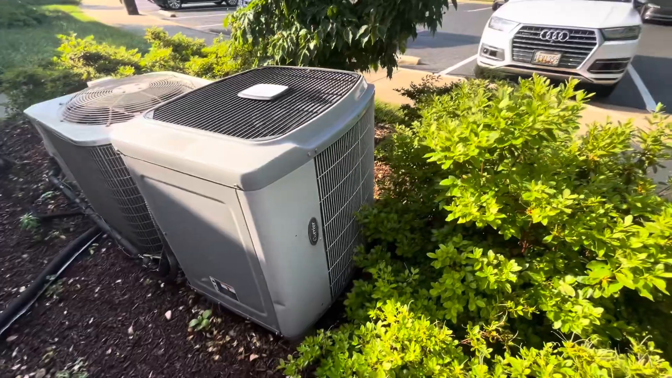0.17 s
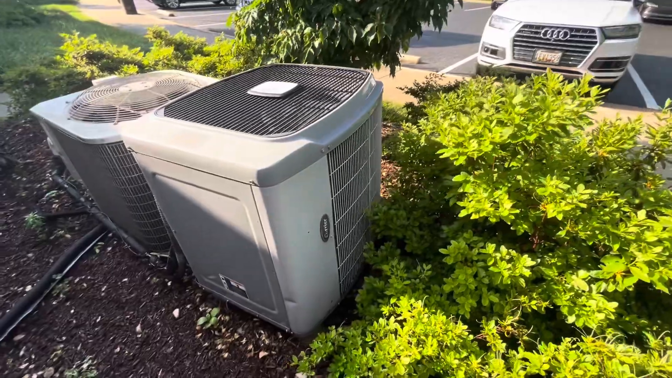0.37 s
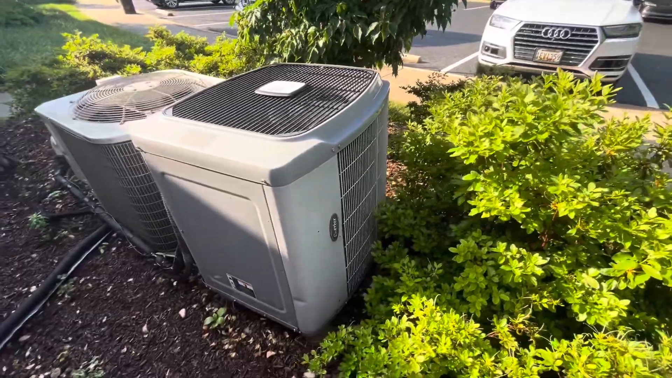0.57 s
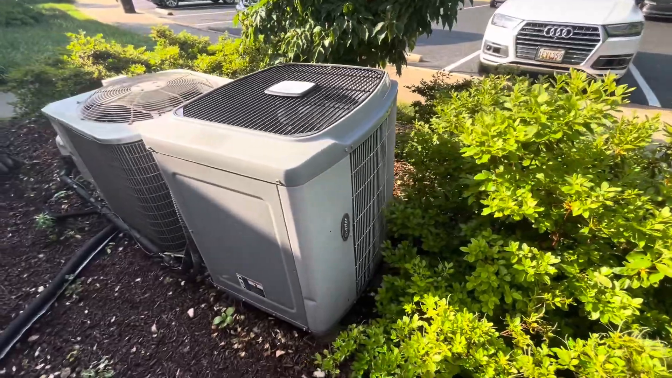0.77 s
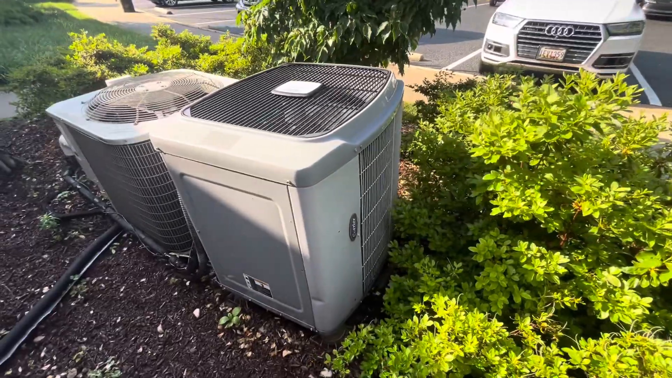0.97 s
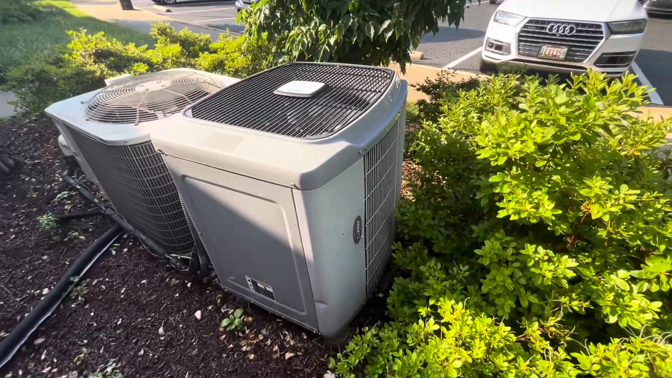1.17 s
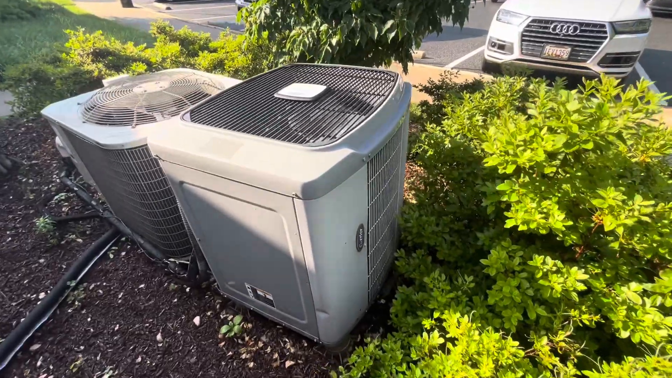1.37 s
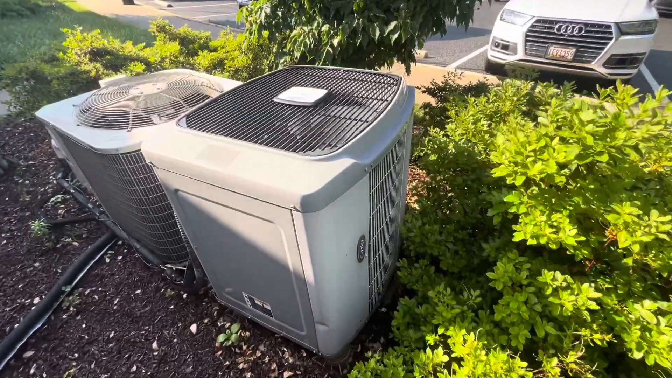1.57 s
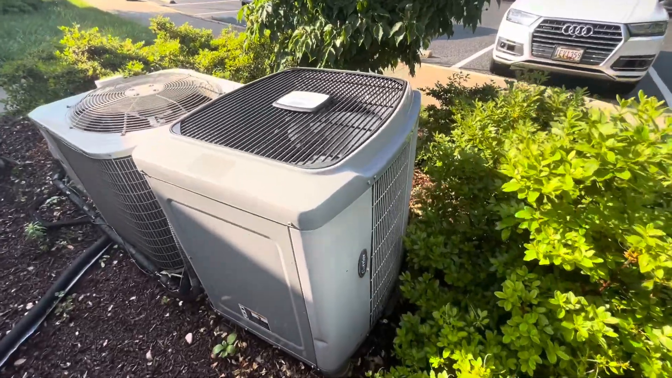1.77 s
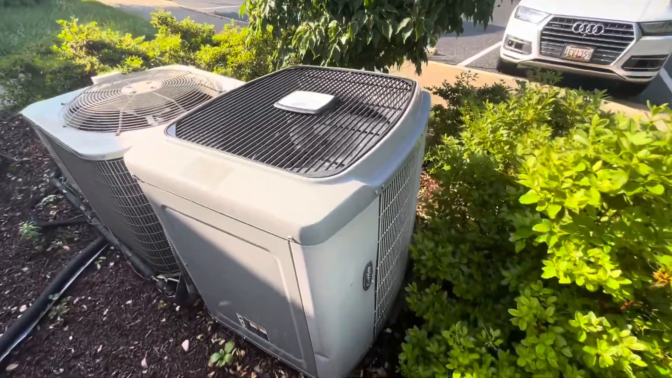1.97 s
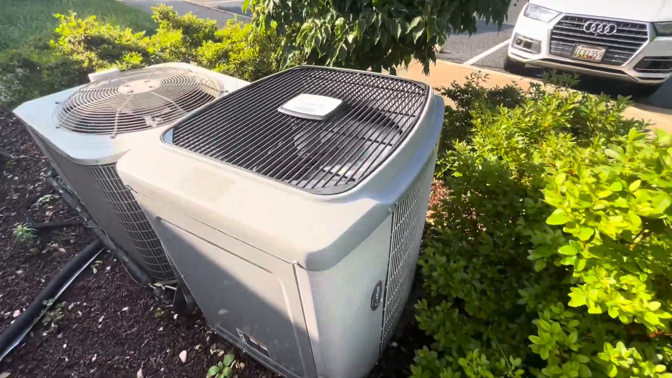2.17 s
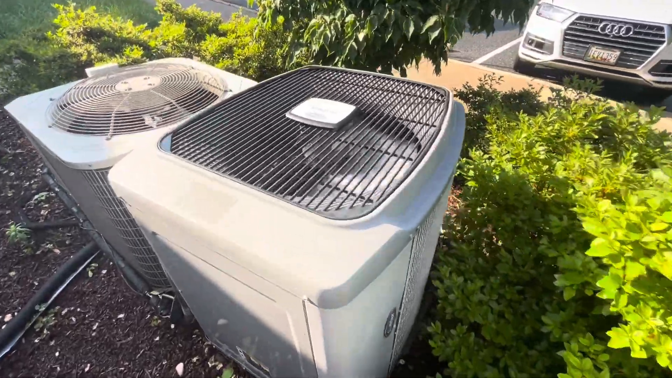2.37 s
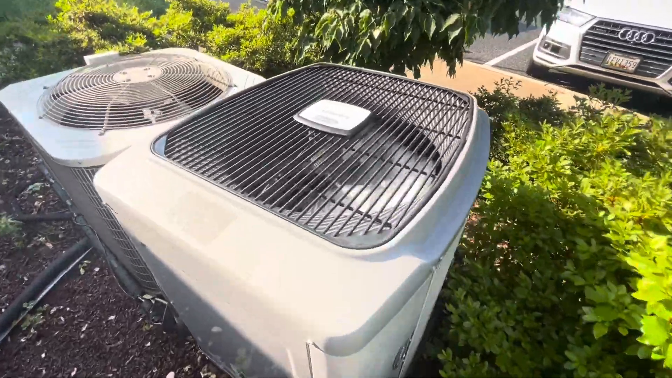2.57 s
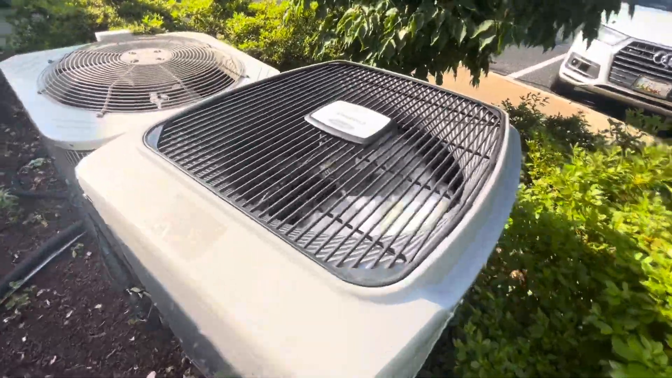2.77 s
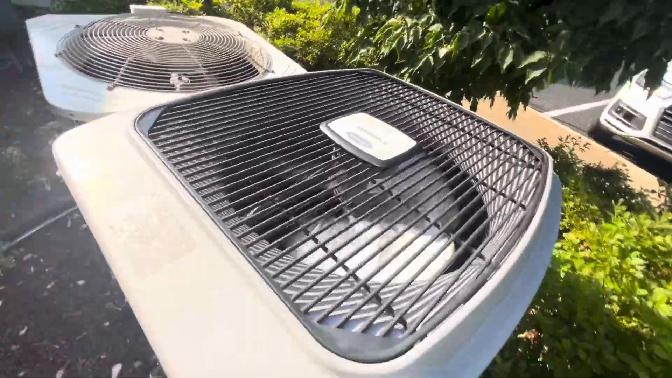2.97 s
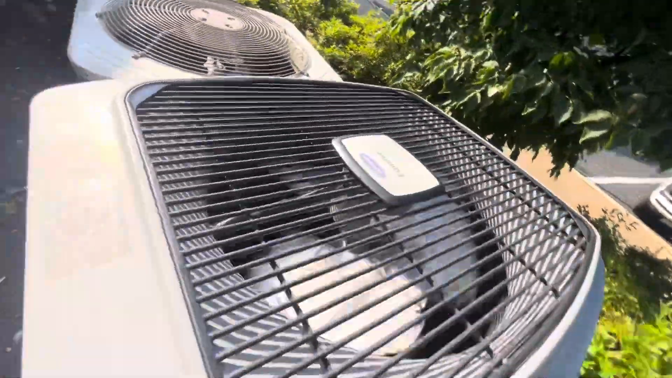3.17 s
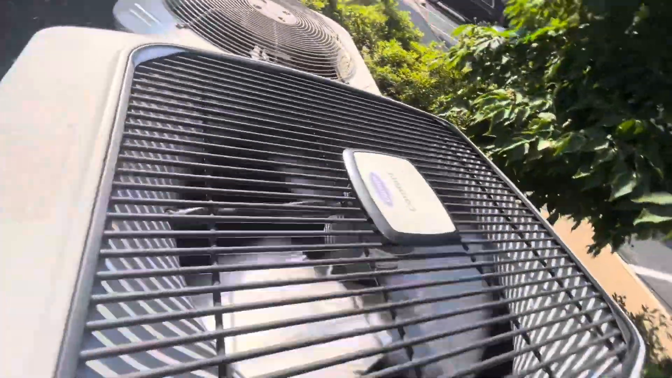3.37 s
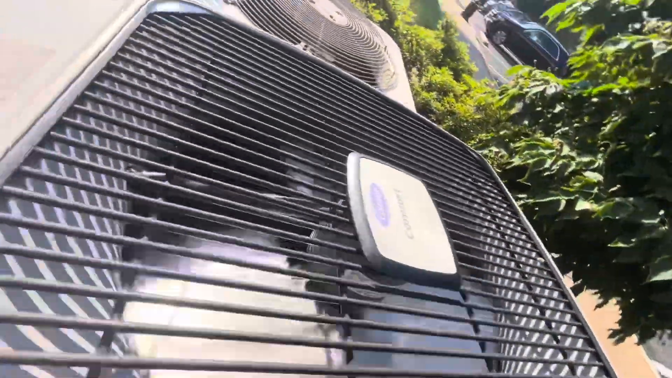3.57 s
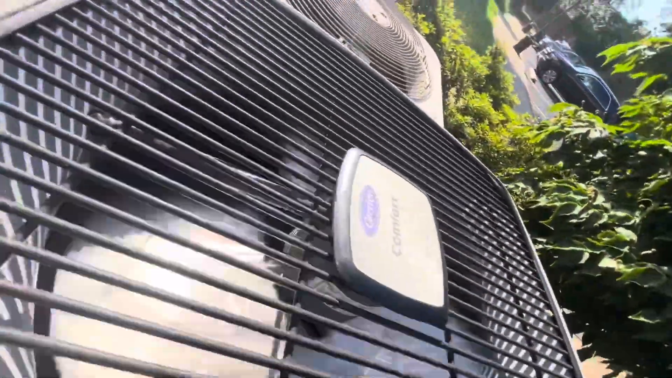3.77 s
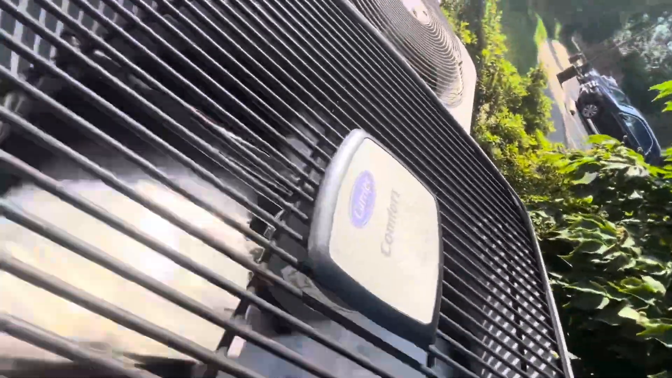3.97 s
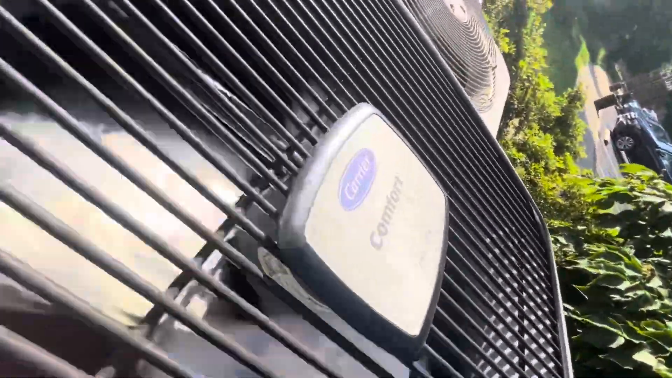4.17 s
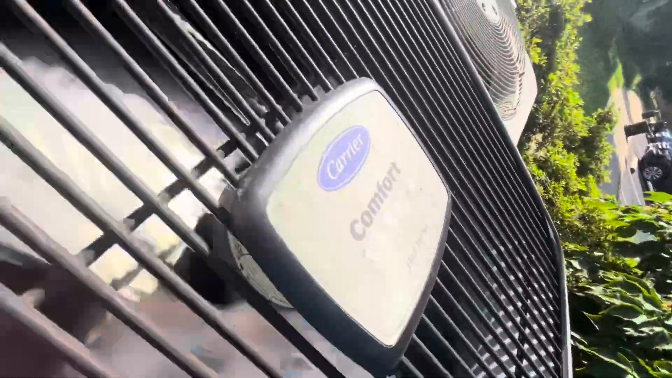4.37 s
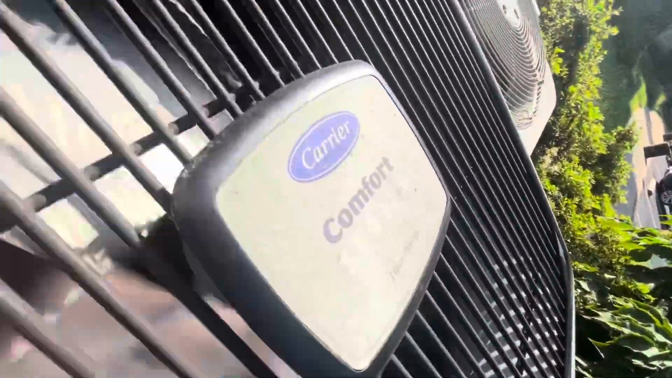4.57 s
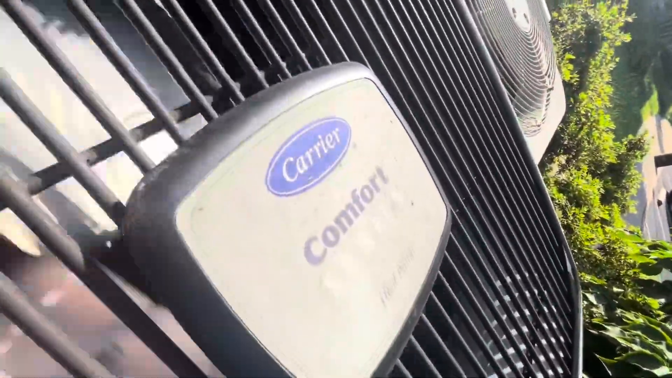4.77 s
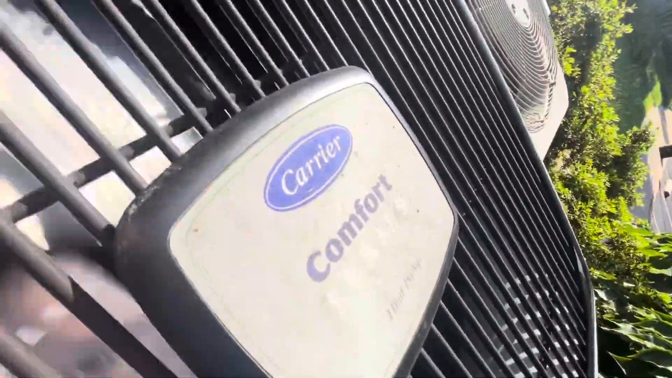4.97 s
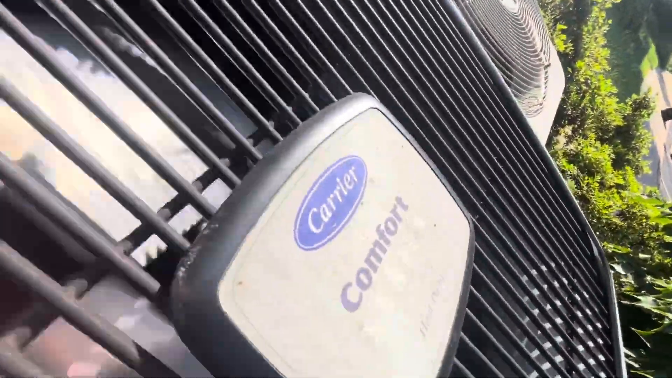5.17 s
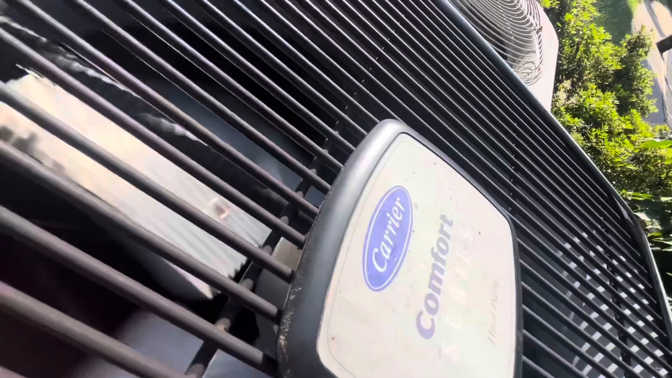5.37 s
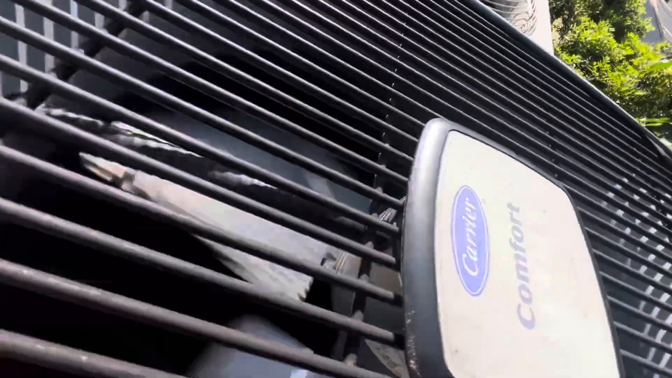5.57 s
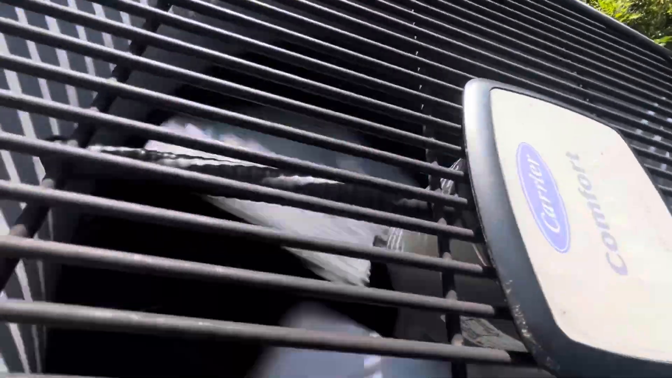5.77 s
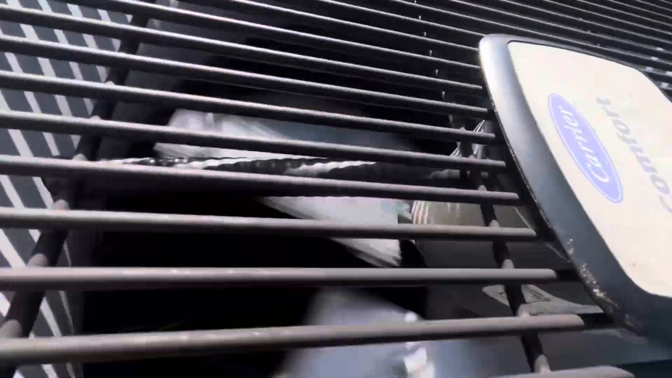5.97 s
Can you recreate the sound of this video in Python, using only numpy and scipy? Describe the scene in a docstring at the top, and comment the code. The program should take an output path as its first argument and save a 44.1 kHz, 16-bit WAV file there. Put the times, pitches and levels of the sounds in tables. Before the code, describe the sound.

An outdoor air conditioning unit runs with a steady fan rush and compressor hum, while mulch rustles faintly underfoot. The machine grows louder as the phone microphone is carried closer. About halfway through, the microphone dips into the air blowing from the fan, and loud, deep gusts thump and rasp against it. The wind then eases into a brighter, fluttering buffeting that continues over the hum until the end.

```python
"""First comes the steady rush and hum of an outdoor condenser unit, with mulch rustling underfoot.
Its fan, casing and compressor grow louder as a phone is carried closer. About three seconds in,
the phone dips into the air jet above the grille: eddies (swirls of air) thump and rasp on its two
microphone ports, chopped by the wakes of the fan blades. The phone's stereo mixing spreads each
port's wind to the other side, and a limiter holds down the peaks."""
import sys
import numpy as np
from scipy import signal
from scipy.fft import rfft, irfft
from scipy.io import wavfile
from scipy.ndimage import uniform_filter1d, minimum_filter1d

SR = 44100
rng = np.random.default_rng(int(sys.argv[2]) if len(sys.argv) > 2 else 0)


def generate_wav(sig):
    """Save sig (samples, or channels by samples) to the path in sys.argv[1] as 16-bit PCM at SR."""
    pcm = np.round(np.clip(np.atleast_2d(sig).T, -1, 1) * 32767).astype(np.int16)
    wavfile.write(sys.argv[1], SR, pcm)


N = 264996
T = np.arange(N) / SR
FREQS = np.arange(N // 2 + 1) * SR / N
SHAFT_HZ, BLADE_HZ = 58.97, 40.25  # shaft turns and blade passes each second

# the fan from a few steps away, and over the grille: (frequency [Hz], level [dB])
FAN_FAR = [(25, -30), (45, -5.5), (90, -6.5), (200, -10), (330, -16), (560, -23), (900, -18.5),
           (1200, -23.5), (2400, -33), (2900, -40), (3800, -44.5), (6500, -43.5), (7500, -44),
           (10500, -47.5), (14200, -54.5)]
FAN_NEAR = [(25, -34), (45, -51), (90, -41), (350, -35), (600, -29), (900, -35), (1600, -30.5), (2300, -26),
            (4000, -32), (5500, -40), (7900, -43.5), (11000, -42.5), (13200, -48), (14200, -46)]
# how both sides hear the unit: (frequency [Hz], left minus right [dB], likeness [0-1], left lead [rad])
STEREO = [(60, 1.5, 0.92, 0), (313, 1.5, 1, 0.48), (560, 2, 0.32, 0.32), (840, 0, 1, 0.64),
          (1160, 1.5, 0.54, 1.54), (1800, -2.5, 0.1, 0.76), (2580, -1, 0.07, 0.76), (3100, 6, 0.16, 0),
          (4500, 6.5, 0, 0), (6500, 4.5, 0, 0), (7900, 0.5, 0.04, 1.4), (9850, -2.5, 0.3, 0.2),
          (11100, -1, 1, 0), (12300, 2, 1, 0), (13700, 0, 0.25, 0)]
def fan_rush(near):
    """The fan churns air into broad noise; `near` (0-1) blends in its close-up sound."""
    pan_db, likeness, lead = look_up(STEREO, FREQS)
    likeness = np.clip(likeness, 0, 1)
    left, other = rfft(rng.standard_normal((2, N)))
    right = likeness * left * np.exp(-1j * lead) + np.sqrt(1 - likeness ** 2) * other
    pair = np.array([left * from_db(pan_db / 2), right / from_db(pan_db / 2)])
    far_gain, near_gain = (from_db(with_casing(table, FREQS)) for table in (FAN_FAR, FAN_NEAR))
    out, shared_swell = 0, drift(4.71)
    for centre_hz in 40 * 2. ** np.arange(10):  # each octave swells as the hand and the air move
        band = pair * np.cos(np.pi / 2 * np.clip(np.log2((FREQS + 1) / centre_hz), -1, 1)) ** 2
        blend = (1 - near) * irfft(band * far_gain, N) + near * irfft(band * near_gain, N)
        out += blend * from_db(0.19 * shared_swell + 0.84 * drift(9))
    return out / rms(far_gain)


# where the casing and grille ring or swallow sound: (frequency [Hz], width [Hz], boost [dB])
RESONANCES = [(78.3, 8, -1), (115, 17, 2), (210, 4.3, -5.5), (254, 9.1, 3.5), (294, 35, 1.5), (352, 9.8, 4),
              (767, 57, 3), (942, 36, 6.5), (960, 19, 1.5), (1174, 24, -7), (850, 30, -3), (980, 20, -5),
              (2460, 190, 1), (2550, 31, 4.5), (3770, 290, -2), (5760, 200, 0), (4570, 300, 3),
              (5300, 830, 3.5), (6100, 200, 5.5), (6680, 310, 4)]
def with_casing(table, hz):
    """The casing adds narrow peaks and dips to the fan's levels, in dB."""
    return look_up(table, hz)[0] + sum(db / (1 + (2 * (hz - f) / w) ** 2) for f, w, db in RESONANCES)


# the unit's hum: (pitch [Hz], level a few steps away [dB], at the rim [dB], over the grille [dB])
HUM_TONES = [(80.5, -50, -37, -38), (120.5, -44.5, -37, -46), (201, -48, -49, -55), (241.2, -56, -50, -57),
             (294.9, -48, -46, -53), (360.3, -51, -50, -56), (522.9, -59, -56, -62), (643.4, -62, -54, -60),
             (764, -62, -48, -57), (777, -51, -47, -52), (790.6, -60, -57, -62), (803.6, -58, -54, -60),
             (825.6, -58, -56, -62), (897.2, -52, -55, -58), (924, -59, -55, -58), (1017, -56, -62, -62),
             (1238.5, -61, -58, -62), (1298, -63, -59, -63), (1445, -64, -65, -66), (2655, -75, -70, -71),
             (2890, -77, -74, -74), (2241, -67, -70, -69), (5012.5, -76, -77, -77), (5131, -75, -77, -77),
             (6309, -77, -77, -72), (883.9, -48, -46.5, -46), (911, -58, -58, -50), (1003.1, -50, -59, -56),
             (1356, -67, -56, -60), (1415, -62, -64, -63), (1474.4, -61, -64, -64), (1768.5, -69, -69, -63),
             (1887.3, -62, -68, -67), (2300, -69, -72, -69), (2358.5, -69, -71, -62),
             (2417.5, -68, -71, -69), (2477, -66, -73, -67), (2547, -70, -58.5, -62),
             (2533.6, -73, -65, -68), (2948.5, -76, -77, -70), (4009.4, -77, -79, -70),
             (4423, -82, -78, -68), (4481, -74, -79, -73), (4657.5, -77, -80, -69), (4716.5, -78, -76, -79),
             (5071.5, -76, -75, -75), (5249, -82, -77, -71), (5307, -78, -77, -73), (5484.5, -79, -77, -67),
             (5956, -79, -76, -71), (6252, -77, -78, -75), (6662, -79, -82, -78), (6841, -81, -77, -69)]
def machine_hum(near, arrival_s=(0.7, 2.7, 4.6), beat_hz=0.66):
    """Fan, motors and compressor hold steady tones, each wavering a little in pitch and level."""
    pitches, *levels_db = np.transpose(HUM_TONES)
    pan_db, _, lead = look_up(STEREO, pitches)
    start = rng.random(len(pitches))
    wavers = [drift(4) for _ in range(8)]
    out = np.zeros((2, N))
    for k, hz in enumerate(pitches):
        angle = 2 * np.pi * (hz * T + start[k]) + (0.28 + hz / 3000) * wavers[(k + 3) % 8]
        level_db = np.interp(T, arrival_s, [db[k] for db in levels_db])
        size = np.sqrt(2) * from_db(level_db + (1.5 + min(hz / 1200, 2.2)) * wavers[k % 8])
        if k == 1:  # a slow throb stands for the third blade tone beating against the mains hum
            size *= (1 + 0.4 * np.cos(2 * np.pi * beat_hz * (T - 0.98))) * from_db(1.5 * drift(12))
        out += size * np.cos([angle, angle - lead[k]]) * from_db([[pan_db[k] / 2], [-pan_db[k] / 2]])
    return out + shaft_buzz(pitches) * from_db(6.9 * near)


def shaft_buzz(taken_hz):
    """The turning shaft adds faint tones at multiples of its speed, between the strong ones."""
    multiples = np.array([k for k in range(18, 125) if np.abs(taken_hz - k * SHAFT_HZ).min() > 10])
    scatter, *starts = rng.standard_normal((len(multiples), 3)).T
    level_db = with_casing(FAN_FAR, multiples * SHAFT_HZ) - 38 + 1.5 * scatter
    pan_db = look_up(STEREO, multiples * SHAFT_HZ)[0]
    turn = np.linspace(0, 1, 4097)
    sides = []
    for sign, start in zip((1, -1), starts):
        waves = np.cos(2 * np.pi * (np.outer(multiples, turn) + start[:, None]))
        one_turn = from_db(level_db + sign * pan_db / 2) @ waves
        sides.append(np.interp(SHAFT_HZ * T % 1, turn, one_turn))
    return np.array(sides)


# wind on each port; the left one faces the jet: (time [s], rumble level [dB], rasp level [dB])
GUSTS_LEFT = [(2.3, -58, -54), (2.8, -42, -54), (3.0, -38, -35), (3.085, -26, -40), (3.098, -11.5, -46),
              (3.15, -10.5, -45), (3.175, -30, -35), (3.205, -30, -24.5), (3.219, -5, -27),
              (3.3, -10.5, -31), (3.37, -8.5, -16.5), (3.41, -10, -21), (3.445, -18, -12.5),
              (3.49, -9.5, -16), (3.55, -13, -23), (3.58, -15.5, -18.5), (3.62, -21, -14.5),
              (3.7, -26, -17.5), (3.82, -22, -21.5), (3.95, -17.5, -20.5), (4.12, -16.5, -28),
              (4.29, -16, -27), (4.4, -21.5, -25), (4.45, -19, -24), (4.5, -26, -28), (4.55, -22.5, -28),
              (4.7, -21, -28), (4.8, -29.5, -33), (4.9, -27.5, -31.5), (4.96, -20, -27), (5.02, -31, -33),
              (5.1, -23, -29.5), (5.18, -29, -31), (5.27, -26.5, -29.5), (5.37, -26, -30.5),
              (5.46, -30, -27.5), (5.6, -24.5, -28.5), (5.7, -21.5, -28.5), (5.8, -25.5, -25.5),
              (5.87, -20.5, -24), (5.9, -24, -24), (6.0, -17.5, -27)]
GUSTS_RIGHT = [(2.3, -51, -50), (2.8, -47, -36), (3.0, -52, -34.5), (3.2, -36, -33), (3.36, -21, -29),
               (3.41, -6.5, -41), (3.45, -14, -18.5), (3.49, -11, -21), (3.52, -17, -34), (3.56, -6.5, -27),
               (3.6, -15, -14), (3.645, -29, -18), (3.67, -23, -21), (3.72, -22, -24.5), (3.95, -22.5, -38),
               (4.25, -26, -34.5), (4.4, -29, -38), (5.1, -42, -41), (5.4, -30, -33), (5.748, -29.5, -51),
               (5.9, -18.5, -31), (6.0, -19, -28)]
# what the stereo mixing passes across: (frequency [Hz], level [dB], lag [rad])
LEFT_TO_RIGHT = [(60, -19, 1.1), (250, -10, 1.45), (345, -4.5, 1.52), (509, -3.5, 2.76), (707, 2, 3.63),
                 (880, -1.5, 4.66), (1010, -3.5, 5.06), (1310, -2, 5.18), (1430, -4.5, 4.85),
                 (1960, -12, 4.6), (3000, -11, 1.8)]
RIGHT_TO_LEFT = [(60, -9.5, 3.2), (203, -6.5, 1.8), (355, -6.5, 1.53), (480, -5.5, 5.8), (740, 0, 5.6),
                 (880, 0, 2.84), (1500, -5.5, 1.96), (2500, -7, 1.8), (5000, -27, 1.0)]
def air_jet():
    """The jet hits both microphones, which squash their biggest swings; each spills to the far side."""
    inside = np.clip((T - 2.2) / 0.75, 0, 1)
    left = 1.09 * np.tanh(inside * port_wind(GUSTS_LEFT, side=0) / 1.19)
    right = np.tanh(inside * port_wind(GUSTS_RIGHT, side=1) / 1.155) + overload_ticks()
    return np.array([left + filtered(right, RIGHT_TO_LEFT), right + filtered(left, LEFT_TO_RIGHT)])


# the deep rumble, and the quicker flapping on top of it: (frequency [Hz], level [dB])
RUMBLE_COLOUR = [(25, -59), (45, 1.5), (85, 1), (130, -4), (200, -10), (350, -20.5), (600, -34),
                 (1000, -83), (5000, -95)]
FLAP_COLOUR = [(90, -3), (150, -0.5), (250, -1.5), (400, -8.5), (600, -23.5), (1000, -21), (5000, -90)]
# flapping peaks as the phone tips over the rim: (time [s], level against the rumble [dB])
FLAP_LEVELS = [(3.0, -18), (3.3, -15), (3.43, -12.5), (3.5, -1.5), (3.55, -11), (3.63, -3), (3.68, -1.5),
               (3.9, -12), (4.3, -12.5), (4.6, -8.5), (5.3, -4), (5.7, -17), (6.0, -4.5)]
# faster air makes smaller, brighter eddies: (time [s], brightness [0-1])
RASP_BRIGHTNESS = [(3.0, 0.54), (3.35, 0.01), (3.55, 0.09), (3.64, 0.21), (3.69, 0.5), (3.85, 0.62),
                   (4.1, 0.74), (4.5, 0.53), (5.0, 0.58), (5.5, 0.72), (6.0, 0.62)]
def port_wind(gusts, side):
    """Wind on one port rumbles, flaps, rasps and snaps; blade wakes chop the flapping and the rasp."""
    rumble_db, rasp_db = follow(gusts)
    wake = np.cos(2 * np.pi * BLADE_HZ * T - 0.94 + 0.26 * drift(2.04))
    # the rumble is evened out to a steady low buffeting that follows the gusts
    rumble = even_out(filtered(noise(), RUMBLE_COLOUR), samples=1300, strength=0.24)
    rumble = normalise(rumble * from_db(2.2 * drift(22)))
    flap = normalise(filtered(noise(), FLAP_COLOUR) * from_db(4.5 * drift(28) + 2 * wake))
    flap *= from_db(follow(FLAP_LEVELS)[0])
    eddies = normalise(noise() * from_db(3 * wake + 1.4 * drift(16) + 2.4 * drift(70) + 1.8 * drift(300)))
    rasp = eddy_rasp(eddies, bright=follow(RASP_BRIGHTNESS)[0])
    return (rumble + flap) * from_db(rumble_db) + rasp * from_db(rasp_db) + eddy_snaps(side)


# the rasp of big and of small eddies: (frequency [Hz], level [dB])
BIG_EDDIES = [(150, -11), (350, -2), (520, -0.5), (700, -9), (1000, -12), (1500, -34), (2500, -36.5),
              (9000, -78), (14000, -85)]
SMALL_EDDIES = [(200, -24), (400, -2.5), (620, -3), (850, -0.5), (1100, 0), (1500, -3.5), (2000, -11.5),
                (3000, -23.5), (5000, -31.5), (9000, -73), (14000, -85)]
def eddy_rasp(hiss, bright):
    """Big eddies sound dull and small ones bright; `bright` (0-1) blends the two."""
    hz = np.linspace(0, SR / 2, 2000)
    return sum(share * filtered(hiss, table) / rms(from_db(look_up(table, hz)[0]))
               for share, table in ((1 - bright, BIG_EDDIES), (bright, SMALL_EDDIES)))


# single eddies: (time [s], level [dB], length [ms], brightness [0-1], port [0 left, 1 right])
EDDY_HITS = [(3.093, -12, 1.9, 0, 0), (3.211, -17, 5.4, 0.06, 0), (3.23, -11, 3.3, 0.14, 0),
             (3.267, -5, 10, 0.12, 0), (3.282, -23, 4, 0.1, 0), (3.319, -9.5, 3.9, 0.17, 0),
             (3.347, -10, 3.6, 0, 0), (3.372, -9, 4.7, 0.46, 0), (3.397, -4, 2, 0.09, 0),
             (3.421, -9.5, 3.4, 0.5, 1), (3.4601, -2.5, 7.6, 0.56, 1), (3.462, -6, 5.6, 0.41, 0),
             (3.472, -11, 3.9, 0.1, 1), (3.509, -12, 2.1, 0.17, 1), (3.509, -12, 4.3, 0, 0),
             (3.521, -5, 3.5, 0.27, 1), (3.528, -14, 6.7, 0.8, 1), (3.536, -7, 4.9, 0.3, 0),
             (3.547, -21, 3.3, 0, 1), (3.549, -13.5, 3.8, 0, 0), (3.571, -12, 11, 0.24, 1),
             (3.587, -26, 5, 0.2, 1), (3.599, -12, 6.6, 0.57, 1), (3.613, -9, 13, 0.42, 1),
             (3.63, -11, 2.5, 0.5, 1), (3.685, -15, 3.4, 0.7, 0), (3.696, -10, 3, 0.8, 1),
             (3.725, -8, 5.5, 0.55, 1), (3.756, -17, 7.1, 0.9, 0), (3.773, -9.5, 6.4, 0.58, 0),
             (3.79, -11, 5.1, 0.75, 0), (3.809, -6, 2.8, 0.6, 0), (3.831, -18, 4.7, 0.94, 0),
             (3.848, -14.5, 4.4, 0.97, 0), (3.885, -17, 2.5, 0.8, 0), (3.908, -12.5, 6.4, 1, 0),
             (3.924, -13, 5.5, 0.93, 0), (3.951, -9.5, 10.5, 0.52, 0), (3.973, -14, 7.3, 0.9, 0),
             (3.998, -12.5, 8.1, 0.5, 0), (4.022, -14, 7, 0.7, 0), (4.048, -11.5, 4.7, 1, 0),
             (4.071, -8.5, 4.3, 0.66, 0), (4.102, -15, 3.6, 0.9, 0), (4.13, -18, 4.4, 0.9, 0),
             (4.142, -8.5, 5, 0.55, 0), (4.172, -13.5, 6.4, 0.54, 0), (4.203, -8, 2.7, 0.52, 0),
             (4.22, -17, 3.3, 0.8, 0), (4.243, -16, 2.3, 0.8, 0), (4.265, -13, 2.3, 0.94, 0),
             (4.291, -13.5, 2.9, 0.92, 0), (4.351, -26, 4.8, 0.7, 0), (4.406, -9, 2.5, 0.72, 0),
             (4.424, -10.5, 6.7, 0.72, 0), (4.4299, -4, 7, 0.54, 0), (4.463, -23, 3, 0.36, 0),
             (4.476, -22, 12, 1, 0), (4.4806, -5, 2.4, 0.8, 0), (4.518, -18, 2.8, 0.7, 0),
             (4.56, -14.5, 8.6, 0.43, 0), (5.04, -17, 3.4, 0.8, 0), (5.07, -14, 4, 0.58, 0),
             (5.267, -19.5, 3.4, 0.83, 0), (5.399, -14.5, 3.3, 0.5, 0), (5.476, -15.5, 3.2, 0.63, 0),
             (5.579, -12, 2.5, 0.8, 0), (5.65, -19.5, 4, 0.83, 0), (5.777, -19, 2.2, 1, 0),
             (5.817, -17.5, 9, 0.84, 0), (5.866, -8, 3.5, 0.7, 0), (5.939, -16.5, 7.7, 0.75, 0),
             (5.965, -10, 3, 1, 0), (5.988, -14, 2.9, 0.65, 0)]
def eddy_snaps(side, dull_thump_db=9, bright_thump_db=-18.5):
    """An eddy hits with a burst of rasp and a thump that falls in pitch; big dull ones thump hardest."""
    dull, sharp = (even_out(eddy_rasp(noise(), b), samples=90, strength=0.57) for b in (0, 1))
    out = np.zeros(N)
    for when, db, ms, bright, port in EDDY_HITS:
        if port == side:
            span = slice(int(when * SR) - 300, int(when * SR) + 2000)
            t = T[span] - when
            bump = np.exp(-((t - ms / 2000) / (ms / 1800)) ** 4)
            burst = bump * ((1 - bright) * dull[span] + bright * sharp[span])
            burst *= rms(bump) / rms(burst)
            age = np.maximum(t, 0)
            cycles = 110 * age + 1.78 * (1 - np.exp(-age / 0.0051))  # slides down to 110 Hz
            thump = np.sin(2 * np.pi * cycles) * np.exp(-age / 0.021)
            thump *= from_db((1 - bright) * dull_thump_db + bright * bright_thump_db)
            out[span] += from_db(db) * (0.75 * burst + thump)
    return filtered(out, [(1800, -1), (3000, -4), (6000, -20), (12000, -50)])


# thin crackles: (time [s], level [dB], half-length [ms], brightness [0-1])
CRACKLES = [(3.422, -33, 1.5, 0), (3.4895, -27.5, 2.2, 0.9), (3.524, -29, 1.1, .5), (3.532, -27, 1.6, .2),
            (3.573, -27, 2, 0), (3.603, -30.5, 1.2, 0.3), (3.6305, -28.5, 1.2, 0.8), (3.725, -29, 1, .3)]
def overload_ticks():
    """The strongest gust overdrives the right microphone, which gives tiny ticks."""
    hiss = noise()
    dull = sharp = 0
    for when, db, ms, bright in CRACKLES:
        tick = hiss * from_db(db) * bell_curve(when + 0.001, ms)
        dull += (1 - bright) * tick
        sharp += bright * tick
    return (filtered(dull, [(1000, 0), (3000, 8), (5000, -1.5), (7000, -15), (12000, -30)])
            + filtered(sharp, [(1000, 10), (3000, 9), (9000, -1), (12000, -13)]))


# rustles underfoot: (time [s], level before panning [dB], half-length [ms], strongest frequency [Hz])
MULCH = [(.09, -52, 62, 4280), (.727, -55, 5, 2200), (1.11, -58, 12, 4500), (1.572, -52, 14, 4800),
         (1.575, -59, 22, 8500), (2.47, -57, 59, 4500), (2.89, -58, 40, 4500)]
def mulch_rustle():
    """Dry mulch shifts underfoot in short grainy hisses, mostly on the left."""
    out = 0
    for when, db, ms, hz in MULCH:
        colour = [(hz / 2.5, -30), (hz / 1.15, -9), (hz, 0),
                  (hz * 1.2, -9), (hz * 2.2, -20), (hz * 3, -40)]
        grains = filtered(noise() * from_db(1.7 * drift(200)), colour)
        out += normalise(grains) * from_db(db) * bell_curve(when, ms)
    return out * from_db([[5], [-8]])


def from_db(db):
    return 10 ** (np.asarray(db) / 20)


def rms(x):
    return np.sqrt(np.mean(x ** 2))


def normalise(x):
    return x / rms(x)


def noise():
    return rng.standard_normal(N)


def bell_curve(when, ms):
    return np.exp(-((T - when) / (ms / 1000)) ** 2)


def follow(table):
    """A table's columns, joined up smoothly over time."""
    times, *columns = np.transpose(table)
    return [np.interp(T, times, column) for column in columns]


def look_up(table, hz):
    """A table's columns at these frequencies, with octaves evenly spaced."""
    freqs, *columns = np.transpose(table)
    return [np.interp(np.log(hz + 1), np.log(freqs), column) for column in columns]


def filtered(x, table):
    """Colour a sound by rows of (frequency [Hz], level [dB], optional lag [rad])."""
    db, *lag = look_up(table, FREQS)
    return irfft(rfft(x) * from_db(db) * np.exp(-1j * sum(lag)), N)


def drift(rate):
    """A smooth random wobble of about size 1, with `rate` new values a second."""
    hold = int(SR / rate)
    steps = np.repeat(rng.standard_normal(N // hold + 1), hold)
    return normalise(uniform_filter1d(uniform_filter1d(steps, hold), hold)[:N])


def even_out(x, samples, strength):
    """Flatten the chance swells of a noise."""
    power = uniform_filter1d(normalise(x) ** 2, size=samples)
    return normalise(x / (power + 0.073) ** strength)


# the walk up to the unit: (time [s], fan gain [dB], share of the close-up sound [0-1])
APPROACH = [(0, -35.5, 0.19), (1.3, -35, 0.21), (2.4, -32.5, 0.28), (2.9, -29.5, 0.23), (3.3, -29, 0.22),
            (3.8, -33, 0.7), (4.3, -29, 0.8), (4.8, -29.5, 1), (5.3, -28, 0.77), (5.7, -26, 0.58),
            (6.01, -24, 0.46)]
def scene():
    """Fan and hum draw near, joined by wind on the microphones and rustles underfoot."""
    fan_db, near = follow(APPROACH)
    return from_db(fan_db) * fan_rush(near) + machine_hum(near) + air_jet() + mulch_rustle()


def record(dry, ceiling=0.94, fade_s=(0.032, 0.094), top_hz=14080):
    """The phone turns down just ahead of each big peak, fades in and cuts the highest treble."""
    needed_gain = np.minimum(1, ceiling / (np.abs(dry).max(axis=0) + 1e-9))
    gain = uniform_filter1d(minimum_filter1d(needed_gain, size=601), size=301)
    fade_in = np.interp(T, fade_s, (0, 1)) ** 1.3
    treble_cut = signal.ellip(10, 0.2, 80, top_hz, fs=SR, output="sos")
    return signal.sosfilt(treble_cut, dry * gain * fade_in)


dry = scene()
out = record(dry)
generate_wav(out)
```